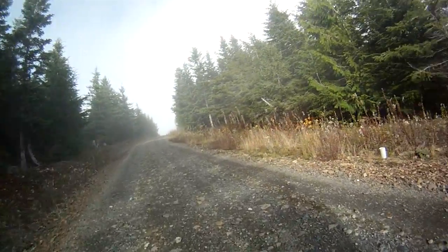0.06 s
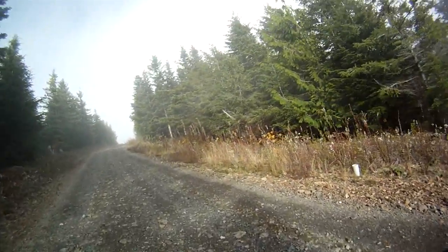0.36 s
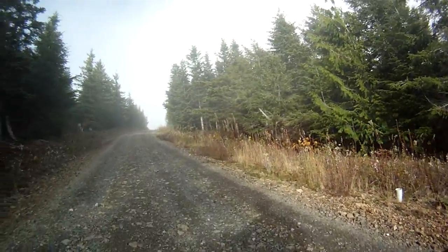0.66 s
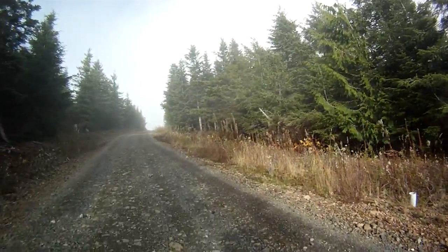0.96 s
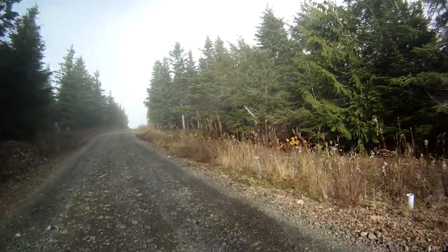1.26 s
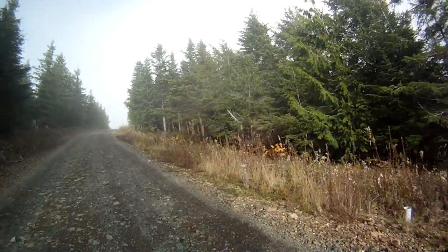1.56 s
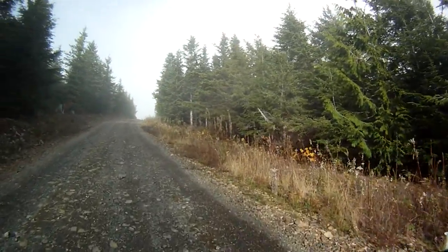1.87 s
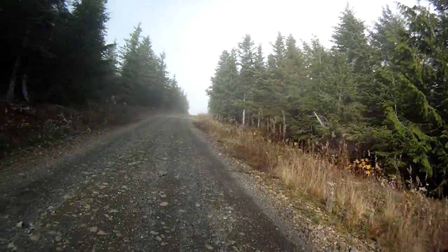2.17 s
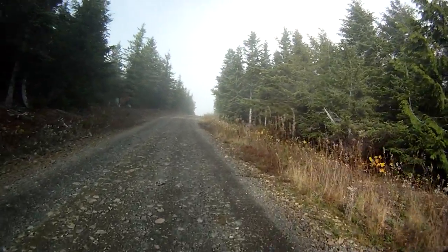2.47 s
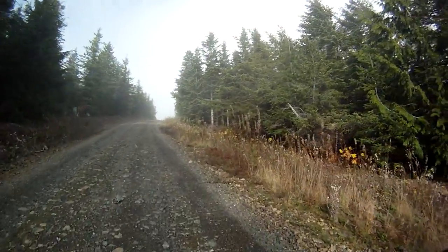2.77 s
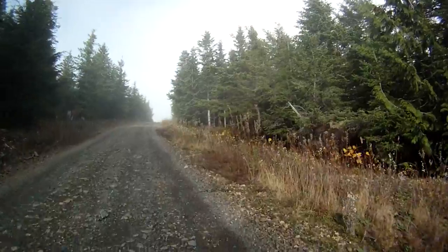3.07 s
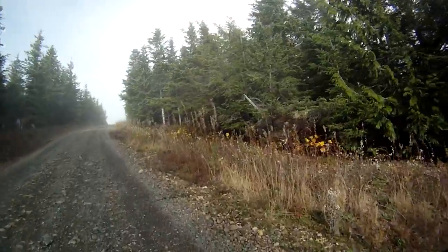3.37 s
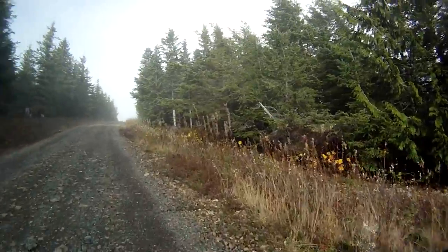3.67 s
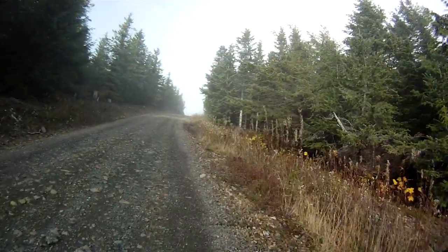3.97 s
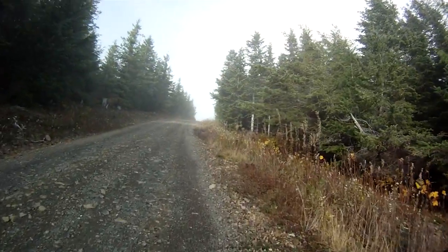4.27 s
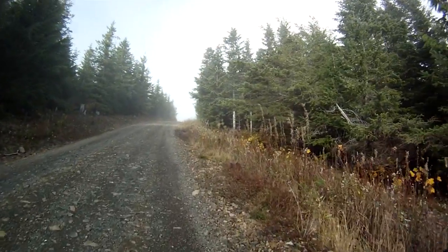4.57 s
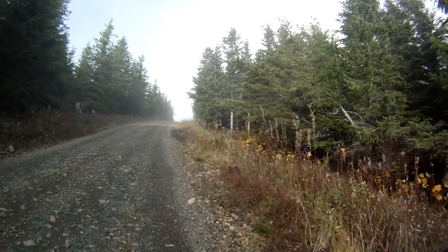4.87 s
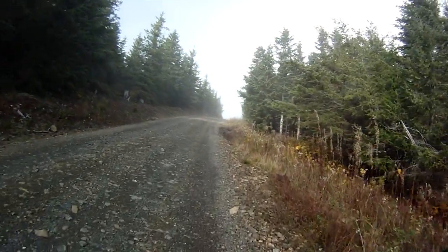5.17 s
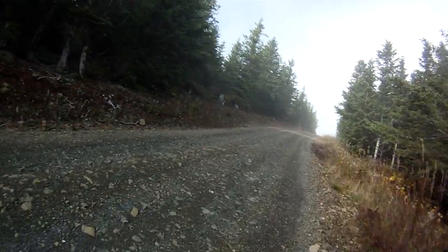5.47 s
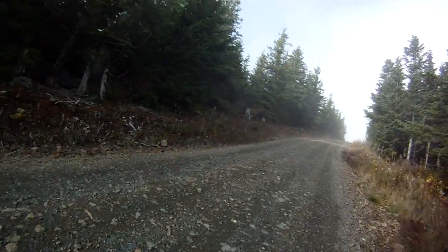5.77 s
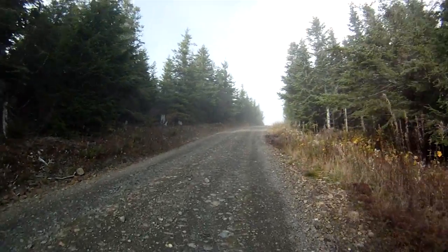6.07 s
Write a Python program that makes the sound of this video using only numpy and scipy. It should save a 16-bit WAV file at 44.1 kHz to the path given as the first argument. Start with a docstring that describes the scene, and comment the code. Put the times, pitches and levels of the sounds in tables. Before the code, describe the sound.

A bike rolls over a gravel road, grit crackling and stones snapping while bumps thump and loose parts knock.

```python
"""A bicycle rolls along a loose gravel road with a small camera mounted on it.
From the start the tyres crunch grit and pop stones, while bumps set the camera mount booming.
Between 0.7 and 3 s loose parts knock against the frame, hardest at 1.5 s. Near 4.4 s a joint creaks
once, and the bike rolls on. All along, the camera samples the sound slowly and holds each sample,
which adds a gritty sheen above the crunch."""
import sys
import numpy as np
from scipy import signal
from scipy.fft import rfft, irfft
from scipy.io import wavfile
from scipy.ndimage import uniform_filter1d

SR = 44100
rng = np.random.default_rng(int(sys.argv[2]) if len(sys.argv) > 2 else 0)


def waveform_to_disk(signal):
    """Save audio, clipped to [-1, 1], as 16-bit WAV at the path in sys.argv[1]."""
    frames = np.transpose(np.atleast_2d(signal))
    scaled = np.clip(frames, -1, 1) * 32767
    samples = np.round(scaled).astype(np.int16)
    wavfile.write(sys.argv[1], SR, samples)


N = 279153
TIME = np.arange(N) / SR


# how deep the loose grit lies, heard as crunch: (time [s], level [dB])
GRIT_DEPTH = [(0, -53.5), (0.3, -46), (0.69, -54.5), (0.82, -47), (1.0, -48), (1.17, -54), (1.25, -61.5),
              (1.35, -48), (1.66, -51.5), (2.12, -45), (2.5, -51.5), (3.1, -49.5), (3.22, -55),
              (4.05, -49.5), (4.6, -54.0), (4.8, -51), (4.97, -60), (5.1, -51), (5.55, -53.5), (6.33, -47)]
# the tone of the fine grit and of the small chips: (frequency [Hz], level [dB])
GRIT_TONE = [(500, -11), (1000, -21), (1700, -0.5), (2300, -4.5), (2950, 5), (3600, 1), (4200, -1),
             (4800, -4.5), (5400, -7), (6000, -20)]
CHIP_TONE = [(800, -28), (2000, -10), (3000, -7), (3600, 6.5), (4150, -9.5), (4750, 6.5), (5300, -4.5),
             (6000, -12)]

def crunch(jolt):
    """Fine grit grinds nonstop and small chips tick in it, louder when a bump presses the tyres down."""
    depth_db, = curve(GRIT_DEPTH)
    crunch_db = together(depth_db, undb(-17.5) * jolt)
    grit = unit(colour(grains(per_s=730, spread_db=4.5, length_s=0.00062), GRIT_TONE))
    chips = unit(colour(grains(per_s=115, spread_db=5, length_s=0.00099), CHIP_TONE))
    flicker = undb(-2 + 2.4 * wander(per_s=22))
    return undb(crunch_db) * (flicker * grit + undb(-0.6) * chips)


# the louder stones: (time [s], level [dB], pitch [Hz], brightness [dB per octave])
LOUD_STONES = [(0.001, -10, 2710, -1), (0.038, -15, 1760, -4.5), (0.046, -15, 2840, -3),
               (0.078, -12.5, 2770, -1.5), (0.109, -22.5, 3370, -2), (0.26, -21, 2960, -4),
               (0.438, -23.5, 3000, -6.5), (0.508, -23.5, 1270, -7), (0.811, -26, 3570, 9),
               (0.826, -29, 3600, 4), (0.948, -31, 3520, 6), (1.139, -30, 4600, 11),
               (1.171, -25.5, 3570, 13), (1.223, -30, 2450, -7), (1.429, -30.5, 4400, 5),
               (1.564, -23, 2760, 0), (1.574, -23.5, 1320, -1), (1.623, -27, 1400, -8),
               (1.703, -22.5, 2170, -6), (1.818, -29, 3570, 17), (1.891, -25.5, 2840, 10),
               (1.999, -23.5, 2880, 2), (2.078, -24, 1180, 2), (2.093, -13.5, 2830, 0),
               (2.101, -19.5, 1330, 5), (2.131, -21.5, 3470, 11), (2.139, -10, 1710, 0.5),
               (2.198, -20.5, 3490, 0), (2.202, -16.5, 2830, 0), (2.223, -28, 1300, -1),
               (2.239, -9.5, 1710, 1.5), (2.275, -19, 3480, -3), (2.344, -28, 2800, 7),
               (2.401, -21, 2720, 2), (2.476, -23.5, 1160, 4), (2.682, -26.5, 2950, 10),
               (2.749, -28.5, 1310, 9), (2.85, -25, 1290, -6), (2.907, -27, 3560, 5), (2.94, -29, 1240, 12),
               (3.13, -24, 3050, 6), (3.145, -32.5, 2000, -8), (3.262, -17, 2540, -1),
               (3.355, -28, 2920, 8), (3.431, -28, 1360, 1), (3.638, -26, 1190, 2), (3.661, -16, 1530, 2.5),
               (3.696, -22.5, 1830, -2), (3.799, -21.5, 1520, -1.5), (3.893, -21, 3400, -4),
               (3.902, -19, 2820, -1.5), (3.937, -17, 1860, -1.5), (3.973, -18.5, 1320, 5),
               (4.043, -21.5, 3520, -2), (4.233, -25.5, 2330, -5), (4.278, -26, 2740, -1.5),
               (4.718, -27.5, 3730, -6), (5.206, -26.5, 1590, -0.5), (5.261, -26, 2840, -2),
               (5.348, -21.5, 1220, -1.5), (5.656, -25.5, 1980, -2), (5.71, -25.5, 1900, -1),
               (5.869, -25, 2260, -4.5), (6.219, -20.5, 1670, 3.5), (6.279, -26, 1250, -7)]

def stones():
    """The tyres squeeze out the louder stones one by one."""
    out = np.zeros(N)
    for s, db, hz, bright_db in LOUD_STONES:
        add(out, s - 0.0004, undb(db) * pop(hz, bright_db))
    return out


def pebbles(count=18):
    """Smaller stones pop at random, louder where the grit lies deep."""
    depth_db, = curve(GRIT_DEPTH)
    out = np.zeros(N)
    for slot, (when, softer, octaves) in enumerate(rng.uniform(-1, 1, size=(count, 3)) * [1, 2.5, 0.45]):
        s = (slot + (when + 1) / 2) / count * TIME[-1]  # one pebble in each equal slot of time
        db = np.interp(s, TIME, depth_db) + 17.5 - softer
        add(out, s, undb(db) * pop(hz=2710 * 2 ** octaves, bright_db=1.5))
    return out


def pop(hz, bright_db):
    """One stone snaps out from under the tread."""
    bands = HIT_BANDS[1:]  # all but the thud
    levels = band_levels(bands, [-4.5, -6.5, -4, -13.5], hz, bright_db)
    return undb(-8.5) * hit(bands, levels, hz, sharpness=7.1, pitch_db=12, tap_db=-8, rise_s=0.000704,
                            decay_s=0.0029, low_linger=0.74, tail_db=-30.5, tail_s=0.0054, frame_db=-9.5)


# stones grinding sideways under the tread: (middle time [s], half length [s], level [dB])
SLIDES = [(0.235, 0.017, -35), (0.513, 0.0099, -35.5), (1.08, 0.031, -36.5), (1.518, 0.0022, -21),
          (1.696, 0.008, -32), (2.788, 0.029, -42), (4.345, 0.014, -39), (5.104, 0.01, -40.5),
          (5.972, 0.016, -40), (6.267, 0.012, -32.5)]
# the tone of a sliding stone: (frequency [Hz], level [dB])
SLIDE_TONE = [(300, -2), (600, -4.5), (950, 0.5), (1250, 5.5), (1600, -7), (2900, -9), (3800, -5.5),
              (5500, -27)]

def scrapes():
    """A stone slides a little: a short swell of many tiny rough contacts."""
    pressure = sum(undb(db) * np.exp(-((TIME - s) / half_s) ** 2) for s, half_s, db in SLIDES)
    rub = grains(per_s=700, spread_db=4.5, length_s=0.00046)
    return pressure * unit(colour(rub + undb(-10) * ring(rub, FRAME_RINGS), SLIDE_TONE))


# loose parts knocking: (time [s], level [dB], pitch [Hz], brightness [dB per octave], fade time [s])
PART_KNOCKS = [(0.722, -14, 1290, -6, 0.0019), (0.737, -9, 1260, -6.5, 0.0017),
               (0.754, -12.5, 1210, -2, 0.003), (0.775, -2.5, 664, -0.5, 0.0017),
               (1.056, -13, 556, -1.5, 0.0038), (1.078, -9.5, 610, -2.5, 0.0077),
               (1.11, -9.5, 563, 0.5, 0.0071), (1.127, -24, 627, -6, 0.0023),
               (1.416, -19.5, 217, -3, 0.0025), (1.521, 1, 566, 1.5, 0.0023), (1.971, -17, 843, -2, 0.0015),
               (2.513, -23.5, 212, 0, 0.0019), (2.981, -25.5, 563, -8.5, 0.0066)]

def knocks():
    """Bumps throw loose parts against the frame, in heavier hits than the stones make."""
    out = np.zeros(N)
    for s, db, hz, bright_db, decay_s in PART_KNOCKS:
        levels = band_levels(HIT_BANDS, [-12.5, -7, -7.5, -4, -7.5], hz, bright_db)
        knock = hit(HIT_BANDS, levels, hz, sharpness=11.5, pitch_db=17, tap_db=-6.5, rise_s=0.001792,
                    decay_s=decay_s, low_linger=0.043, tail_db=-16, tail_s=0.012, frame_db=-2)
        add(out, s - 0.0003, undb(db - 7.8) * knock)
    return out


# the thud, body, clack, snap and tick of a hit: (low edge [Hz], high edge [Hz])
HIT_BANDS = [(85, 380), (400, 1000), (1000, 2000), (2000, 3900), (3900, 5600)]
# the notes the bike and mount ring with: (pitch [Hz], width [Hz], level [dB])
FRAME_RINGS = [(123, 29, 6), (203.4, 72, 5.5), (466.7, 21.5, 16), (550, 16, 8.5), (611.5, 47, 16.5),
               (838, 35, 10.5), (1174, 23, 13), (1287, 52, 11.5), (1615, 25, -1.5), (2420, 220, 6.5),
               (2874, 176, 11.5), (3730, 61, 14)]

def hit(bands, levels, hz, sharpness, pitch_db, tap_db, rise_s, decay_s, low_linger,
        tail_db, tail_s, frame_db):
    """A tap and a brief rough contact make both the struck thing and the frame ring."""
    age = TIME[:SR // 12]
    tap = np.sinc((age - rise_s) * SR)
    fade_s = decay_s * (2000 / np.array(bands)[:, 1:]) ** low_linger  # low bands die away later
    rise = 1 - np.exp(-(age / rise_s) ** 2)
    force = rise * (np.exp(-age / fade_s) + undb(tail_db) * np.exp(-age / tail_s))
    rough = force / np.linalg.norm(force, axis=1, keepdims=True) * rng.choice([-1, 1], force.shape)
    contact = undb(tap_db) * tap + rough
    own_note = ring(contact, [(hz, hz / sharpness, pitch_db)])
    struck = contact + own_note + undb(frame_db) * ring(contact, FRAME_RINGS)
    out = sum(undb(db) * unit(band(part, low, high, order=3))
              for part, (low, high), db in zip(struck, bands, levels))
    return out / np.sqrt(uniform_filter1d(out ** 2, size=176).max())  # the loudest 4 ms get strength 1


def band_levels(bands, base_db, hz, bright_db, focus_db=6.5):
    """A hit favours the bands near its own pitch; a harder contact tilts it toward the highs."""
    octaves = np.log2(np.sqrt(np.prod(bands, axis=1)) / hz)
    return np.array(base_db) - focus_db * np.abs(octaves) + bright_db * octaves


# bumps in the road: (time [s], level [dB], fade time [s])
ROAD_BUMPS = [(-0.02, -28, 0.065), (0.07, -28, 0.16), (0.245, -26, 0.046), (0.775, -24, 0.058),
              (1.055, -30, 0.043), (1.12, -25, 0.028), (1.31, -37, 0.023), (1.41, -31.5, 0.076),
              (1.51, -20, 0.067), (1.68, -33, .03), (1.795, -28, 0.02), (1.96, -33, 0.051),
              (2.06, -34, 0.12), (2.5, -30.5, 0.11), (3.0, -30, 0.05), (3.345, -27, 0.044),
              (3.52, -34, 0.058), (3.735, -32, 0.066), (4.29, -35.5, 0.089), (4.44, -37.5, 0.17),
              (4.724, -28.5, 0.065), (5.09, -33, 0.063), (6.245, -27.5, 0.035)]

def jolting(rise_s=0.02):
    """How hard the bumps shake the bike: each swells quickly and dies away."""
    power = np.zeros(N)
    for s, db, decay_s in ROAD_BUMPS:
        age = np.maximum(TIME - s, 0)
        swell = (1 - np.exp(-(age / rise_s) ** 2)) * np.exp(-age / decay_s)
        power += (undb(db) * swell / swell.max()) ** 2
    return np.sqrt(power)


# the tone of the swaying mount: (frequency [Hz], level [dB])
SWAY_TONE = [(10, -35), (20, -2), (35, 2), (55, 4), (80, -0.5), (110, -21.5), (170, -31.5)]

def mount_boom(jolt):
    """Bumps and small ruts shake the springy mount, which booms at one low pitch over a looser sway."""
    road_db, = curve(ROAD_ROUGHNESS)
    tremble_db = road_db + 3.5 + 3.5 * wander(per_s=15)  # the small ruts
    shake_db = together(tremble_db, jolt)
    boom = tone(hz=59 + 2.34 * wander(per_s=12))
    sway = unit(colour(rng.standard_normal(N), SWAY_TONE))
    return undb(shake_db - 4.5) * boom + undb(0.47 * shake_db - 26) * sway


# how the creak swells and fades: (time [s], rasp level [dB], squeal level [dB])
CREAK_LEVELS = [(4.352, -67, -80), (4.3635, -37, -50), (4.3665, -24.5, -34), (4.383, -25.5, -36),
                (4.397, -19, -27), (4.404, -33, -19.5), (4.412, -38, -32), (4.42, -58, -48),
                (4.43, -80, -90)]
# the notes the joint rings with: (pitch [Hz], width [Hz], level [dB])
JOINT_RINGS = [(624, 38, 5), (843, 47, 5.5), (1170, 77, 5.5), (1260, 24, -13), (1640, 24, -5),
               (2000, 90, -12), (2740, 330, -10.5), (3370, 140, -8.5), (3740, 120, -4)]

def creak():
    """A joint under load sticks and slips for a moment, then locks into a short squeal."""
    rasp_db, squeal_db = curve(CREAK_LEVELS)
    slip_hz = 310 * np.exp(0.12 * wander(per_s=200))
    slips = np.diff(np.floor(np.cumsum(slip_hz) / SR), prepend=0)  # one click for each slip
    rasp = band(ring(slips + 0.086 * rng.standard_normal(N), JOINT_RINGS), 440, 3320, order=7)
    rasp /= np.sqrt(uniform_filter1d(rasp ** 2, size=SR // 100))  # even out the loudness
    squeal = tone(hz=1302 + 8 * wander(per_s=100))
    return undb(rasp_db) * rasp + undb(squeal_db) * squeal


# how rough the road is, heard as roar: (time [s], level [dB])
ROAD_ROUGHNESS = [(0, -42), (0.35, -46), (0.5, -44.5), (0.68, -46.5), (1.0, -43.0), (1.27, -46.5),
                  (2.1, -44), (2.65, -47.0), (3.15, -46), (3.55, -47.5), (4.2, -45.5), (4.6, -50.0),
                  (4.95, -50.5), (5.1, -47.5), (5.55, -47), (6.0, -45.5), (6.33, -47.5)]
# the tone of that roar: (frequency [Hz], level [dB])
ROAR_TONE = [(70, 8.5), (120, -4.5), (160, -6), (250, 1), (350, -6.5), (480, -2), (680, 3), (950, -4),
             (1250, -3.5), (1900, -8.5), (3000, -9), (5500, -36)]

def road_roar():
    """Countless small jolts travel from the tyres up through the frame."""
    road_db, = curve(ROAD_ROUGHNESS)
    jolts = grains(per_s=320, spread_db=3, length_s=0.0028) + 0.61 * rng.standard_normal(N)
    body = colour(jolts + undb(-7.5) * ring(jolts, FRAME_RINGS), ROAR_TONE)
    return unit(body) * undb(road_db + 1.5 + 1.02 * wander(per_s=13))


def grains(per_s, spread_db, length_s):
    """Random contacts of uneven size, each a tiny burst of cracking noise."""
    starts = rng.random(N) < per_s / SR
    size = undb(spread_db * np.minimum(rng.exponential(size=N), np.pi))
    age = TIME[:SR // 40] / length_s
    power = signal.fftconvolve(starts * size ** 2, (age * np.exp(-age)) ** 2)[:N]
    return unit(np.sqrt(np.abs(power)) * rng.standard_normal(N))


def colour(x, points, size=8192):
    """Shape a sound's lows and highs to follow a tone table."""
    hz, db = np.transpose(points)
    log_hz = np.log(np.fft.rfftfreq(size, 1 / SR) + 1)
    log_gain = np.log(undb(np.interp(log_hz, np.log(hz), db)))
    cepstrum = irfft(log_gain, size)
    cepstrum[1:] *= 2  # doubled, then cut in half, so the filter rings only after a sound
    response = irfft(np.exp(rfft(cepstrum[:size // 2], size)), size)
    return signal.fftconvolve(x, response)[:len(x)]


def ring(x, notes):
    """Let a sound set notes ringing; narrower ones ring longer."""
    return sum(undb(db) * signal.lfilter(*signal.iirpeak(hz, hz / width, fs=SR), x)
               for hz, width, db in notes)


def band(x, low_hz, high_hz, order):
    """Keep what lies between two frequencies."""
    return signal.sosfilt(signal.butter(order, [low_hz, high_hz], "band", fs=SR, output="sos"), x)


def tone(hz):
    """A pure tone that follows a changing pitch."""
    return unit(np.sin(2 * np.pi * np.cumsum(hz) / SR))


def wander(per_s):
    """A smooth random drift, roughly between -1 and 1."""
    knots = np.arange(0, N / SR + 1, 1 / per_s)
    return np.interp(TIME, knots, rng.standard_normal(len(knots)))


def curve(rows):
    """Join a table's points in time with straight lines, one curve for each level column."""
    s, *columns = np.transpose(rows)
    return [np.interp(TIME, s, column) for column in columns]


def add(track, s, sound):
    """Mix a sound into a track at a time in seconds."""
    start = max(int(s * SR), 0)
    track[start:start + len(sound)] += sound[:N - start]


def together(db, gain):
    """The joint level in dB of two unrelated parts, one in dB and one as a gain."""
    return 20 * np.log10(np.hypot(undb(db), gain))


def undb(db):
    """Turn decibels into a gain to multiply by."""
    return 10 ** (np.asarray(db) / 20)


def unit(x):
    """Scale to an average strength (rms) of 1."""
    return x / np.sqrt(np.mean(x ** 2))


def scene():
    """Everything rides along with the microphone, in open air without echo."""
    jolt = jolting()
    gravel = crunch(jolt) + stones() + pebbles() + scrapes()
    bike = mount_boom(jolt) + road_roar() + knocks() + creak()
    return (gravel + bike)[None]


def record(dry, hold_hz=12000, top_hz=15500):
    """The camera holds each sample, mirroring the sound into the highs; peaks clip and the top is cut."""
    narrow = signal.sosfilt(signal.butter(12, 5600, fs=SR, output="sos"), dry)
    samples = np.clip(signal.resample_poly(narrow, hold_hz, SR, axis=1), -1, 1)
    steps = np.repeat(samples, 4, axis=1)
    held = signal.resample_poly(steps, SR, 4 * hold_hz, axis=1)[:, :N]
    return signal.sosfilt(signal.ellip(8, 0.2, 70, top_hz, fs=SR, output="sos"), held)


dry = scene()
out = record(dry)
waveform_to_disk(out)
```